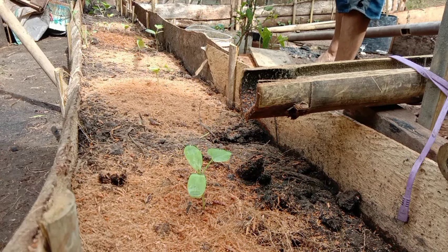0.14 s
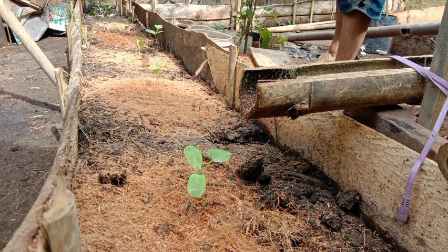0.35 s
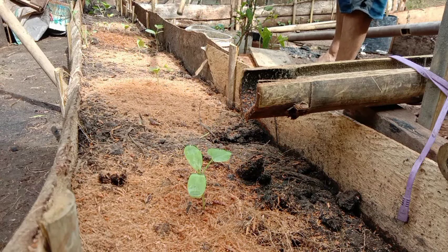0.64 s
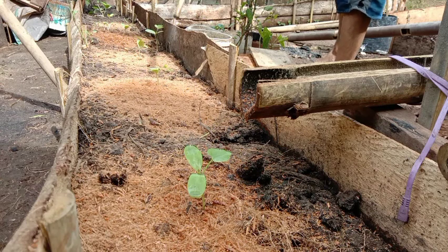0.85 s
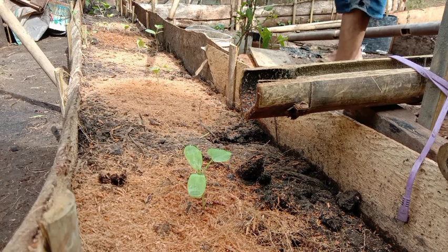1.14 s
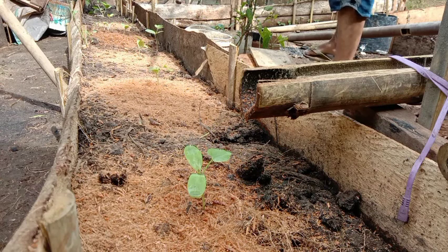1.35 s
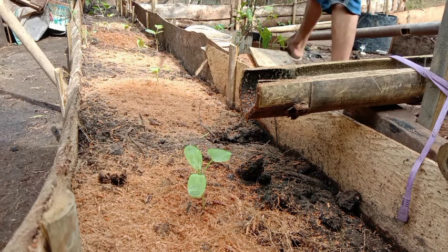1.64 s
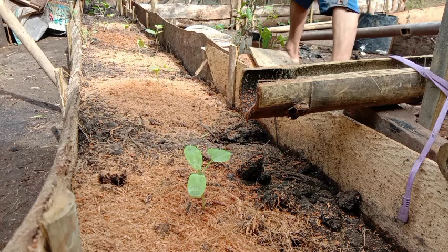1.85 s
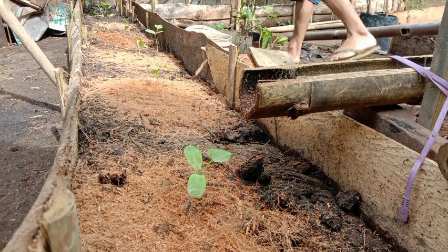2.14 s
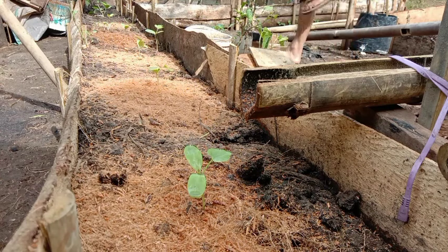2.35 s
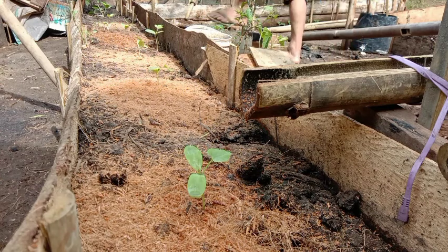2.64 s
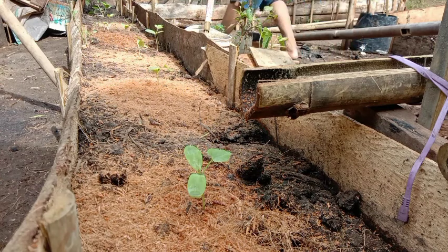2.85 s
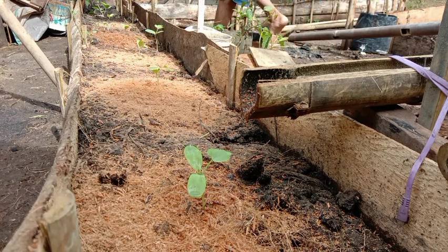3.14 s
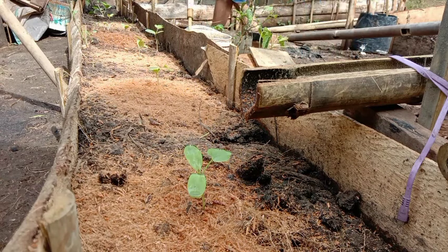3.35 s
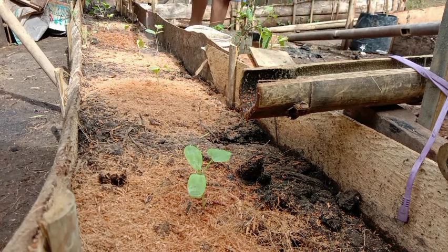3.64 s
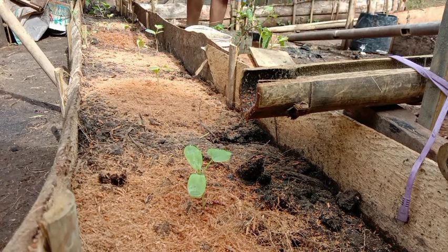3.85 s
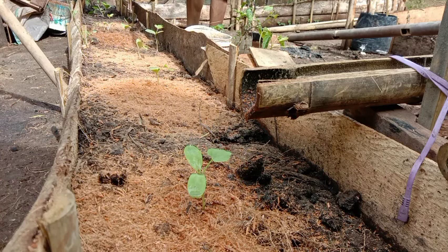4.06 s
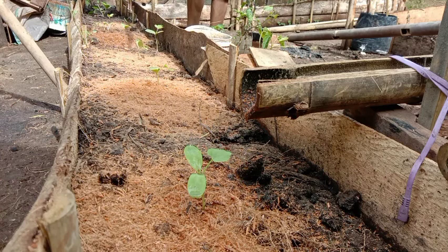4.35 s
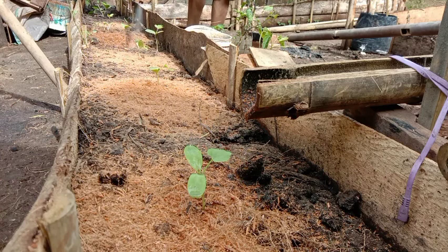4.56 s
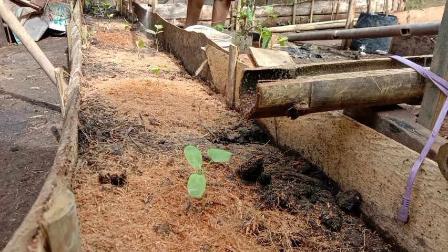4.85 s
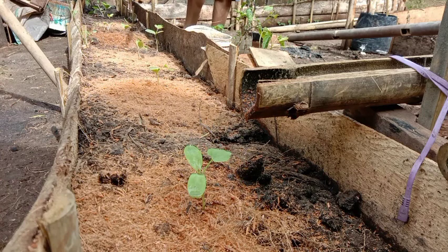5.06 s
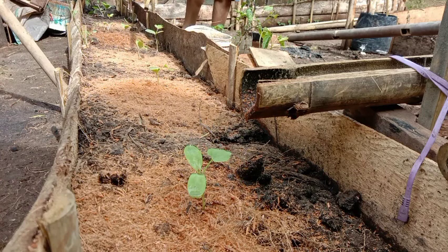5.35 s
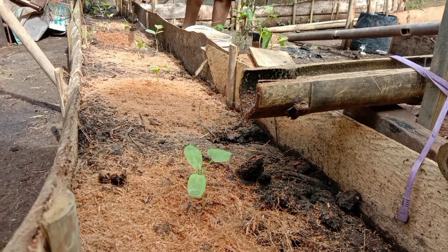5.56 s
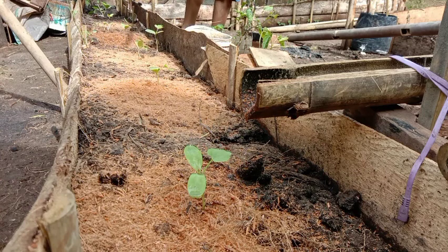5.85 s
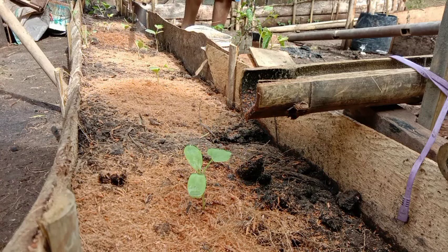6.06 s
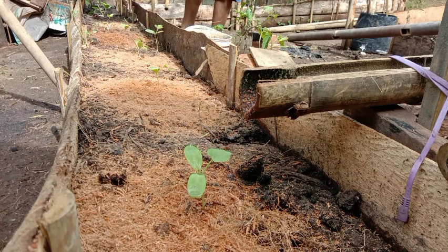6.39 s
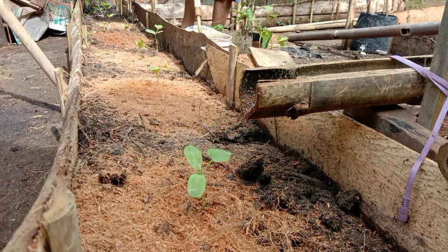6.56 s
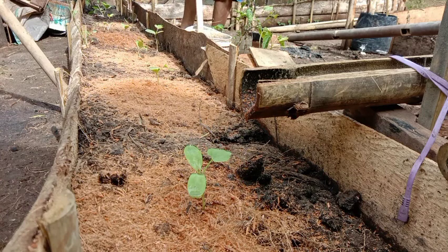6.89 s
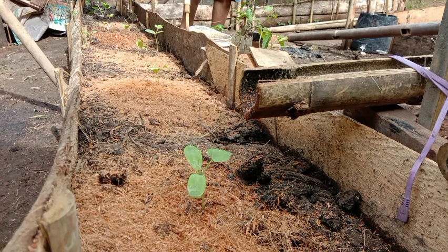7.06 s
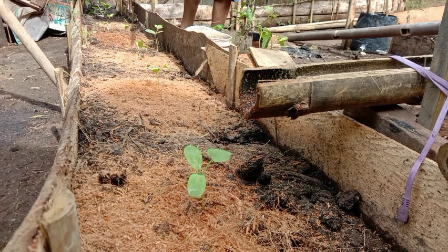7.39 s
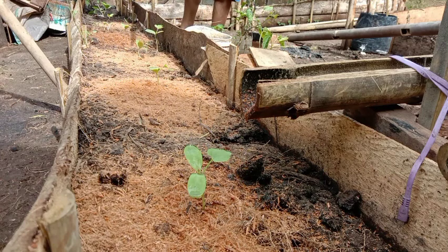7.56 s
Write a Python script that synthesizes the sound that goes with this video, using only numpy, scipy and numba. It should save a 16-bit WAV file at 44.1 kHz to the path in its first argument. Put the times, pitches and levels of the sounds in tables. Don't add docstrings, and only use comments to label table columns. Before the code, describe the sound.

In an open garden, a hand pump sprayer a few metres away gives seven quick hissing jets with hollow gurgles and plastic knocks. A near-silent gap follows with faint quick bird chirps and dim distant calls. A sharp pop restarts the busy spraying, then another quiet pause, a strong burst and weak, sputtering last strokes. A phone microphone with noise suppression leaves the background patchy.

```python
import sys
import numpy as np
from scipy import signal
from scipy.io import wavfile
from scipy.ndimage import uniform_filter1d, minimum_filter1d
from numba import njit

SR = 44100
rng = np.random.default_rng(int(sys.argv[2]) if len(sys.argv) > 2 else 0)


def generate_wav(signal):
    frames = np.transpose(np.atleast_2d(signal))
    scaled = np.clip(frames, -1, 1) * 32767
    pcm = np.round(scaled).astype(np.int16)
    wavfile.write(sys.argv[1], SR, pcm)


def elevation(decibels):
    levels = np.asarray(decibels, float)
    return 10 ** (levels / 20)


N = 340893

# full flow from in seconds, until in seconds, first jet level in dB,
# last jet level in dB, slosh level in dB.
PUSHES = [(-.02, 0.051, -35.5, -41.5, -50), (0.171, 0.276, -39.5, -44, -51),
          (0.334, 0.395, -37.5, -37, -52), (0.504, 0.611, -45.5, -39, -59.5), (0.677, 0.756, -35, -40, -54),
          (0.866, 0.997, -45, -39.5, -57.5), (1.057, 1.178, -38, -39, -60), (3.041, 3.142, -36, -37.5, -55),
          (3.205, 3.298, -45, -41, -51.5), (3.529, 3.624, -43, -42, -54), (3.689, 3.748, -37, -30, -57),
          (3.868, 3.936, -43.5, -45.5, -48), (4.042, 4.076, -34, -42, -58),
          (4.152, 4.226, -45.5, -46.5, -50), (4.56, 4.678, -44, -40, -51.5),
          (4.683, 4.79, -40.5, -47.5, -48.5), (4.863, 5.086, -39, -40, -60),
          (5.193, 5.421, -44, -43.5, -57), (5.507, 5.691, -41, -37.5, -57),
          (6.747, 6.891, -55.5, -40, -73.5), (6.922, 6.996, -40.5, -40, -81.5),
          (7.148, 7.263, -51.5, -41.5, -85), (7.29, 7.318, -47, -46, -78)]
# start in seconds, until in seconds, first jet level in dB,
# last jet level in dB, slosh level in dB.
POPS = [
    (2.823, 2.885, -30.5, -43, -74),
    (3.418, 3.434, -41, -29.5, -55),
    (3.434, 3.445, -29.5, -31.5, -57),
    (4.013, 4.04, -42.5, -34, -56),
    (4.314, 4.345, -36, -30, -61),
    (4.345, 4.432, -27.5, -34, -53),
    (6.541, 6.548, -34, -28.5, -60),
    (6.548, 6.63, -24, -51.5, -54.5),
    (7.055, 7.062, -49.5, -59.5, -84),
    (7.107, 7.125, -50, -47.5, -82),
]
# start in seconds, until in seconds, # first jet
# level in dB, last jet level in dB, slosh level in dB.
SPITS = [
    (3.356, 3.368, -38, -44.5, -68),
    (3.386, 3.392, -40, -42.5, -62),
    (3.402, 3.414, -33, -28, -45.5),
    (3.293, 3.3, -39, -40, -60),
    (3.661, 3.668, -48.5, -47.5, -66),
    (3.84, 3.85, -60, -58, -76),
]
# start in seconds, until in seconds,
# first jet level in dB, last jet level in dB, slosh level in dB.
SEEPS = [
    (2.465, 2.82, -68, -65, -77),
    (3.335, 3.352, -62, -60, -58),
    (3.985, 4.01, -63.5, -78, -72),
    (4.275, 4.31, -71, -61, -64),
    (6.26, 6.33, -83, -72.5, -87),
    (6.33, 6.54, -69, -61, -80),
]
# start in seconds, until in seconds, first level in dB, last level in dB.
GLUGS = [(.58, .62, -52, -45), (.945, .985, -44.5, -42.5), (1.085, 1.12, -46.5, -50.5),
         (2.878, 2.9, -45, -51.5), (2.995, 3.01, -61, -56.5), (3.09, 3.13, -49.5, -52.5),
         (3.2, 3.29, -46.5, -44), (3.405, 3.43, -48.5, -49.5), (3.55, 3.65, -49, -49),
         (3.74, 3.76, -49, -57.5), (3.875, 3.95, -54, -54.5), (4.14, 4.22, -47.5, -47.5),
         (4.34, 4.36, -51.5, -51), (4.51, 4.54, -73, -50.5), (4.72, 4.78, -49, -46),
         (5.165, 5.2, -60.5, -50.5), (5.35, 5.4, -52.5, -48.5), (6.55, 6.575, -53.5, -41.5),
         (6.76, 6.86, -63.5, -65), (6.93, 6.96, -65, -65)]
# time in seconds, chamber pitch in Hz, chamber level in dB,
# fine mist level in dB, jet pitch in Hz; levels are above a jet of medium force.
AIM = [(0, 3136, -5, -1.5, 5960), (.6, 3050, -4, -1.5, 5980), (1.199, 3135, -7.5, -1.5, 6060),
       (2.47, 2880, -6.5, -27, 6650), (2.54, 3000, -16.5, 1, 7020), (2.641, 3010, -10.5, 1.5, 7010),
       (2.803, 3376, -25, -3, 6590), (2.829, 3414, -15.5, -15.5, 6700), (2.899, 3590, -9, -7, 6000),
       (3.049, 3410, -9.5, -0.5, 5770), (3.3, 3506, -6, -3, 5950), (3.439, 3570, -14.5, -5, 5530),
       (3.6, 3600, -6, -3.5, 5960), (3.802, 3690, -11.5, -6, 5560), (4.05, 3796, -6, -2, 5900),
       (4.35, 3830, -14.5, -3, 5640), (4.431, 3400, -11, -5, 6480), (4.598, 3330, -9.5, -5, 5700),
       (4.999, 3230, -11.5, -4.5, 5540), (5.7, 3500, -10, -2.5, 5700), (6.33, 2443, -16, 6, 6200),
       (6.5, 2500, -30, 0, 7170), (6.56, 3646, -9.5, -10.5, 6470), (6.75, 3270, -12, -3.5, 5820),
       (7.0, 3310, -10.5, -4, 5690), (7.069, 3280, -26, 13, 6180), (7.12, 3360, -19.5, 0, 5620),
       (7.299, 3285, -18.5, -1, 5410)]
# centre in Hz, width in Hz, level in dB.
MIST = [(9100, 4900, -2.5), (10200, 2700, 3), (13100, 15000, 14.5)]
# start in seconds, end in seconds, pitch in Hz,
# width in Hz, level above the jet in dB.
SPUTTER = [(6.852, 6.9, 3220, 350, -6), (6.92, 6.945, 3540, 250, -2), (6.94, 6.99, 3080, 240, 0),
           (8, 6.4, 4200, 350, -4), (8.5, 6.2, 5800, 600, -1), (6.855, 6.9, 5400, 700, -4.5),
           (7.105, 7.175, 2470, 300, -1), (7.175, 7.265, 2416, 220, -5), (7.27, 7.33, 2560, 400, -2),
           (7.2, 7.25, 3440, 300, -5), (7.107, 7.2, 8100, 300, -8.5), (7.2, 8.4, 4500, 610, -4.5),
           (7.107, 8.2, 6900, 400, -10.5), (7.19, 7.205, 2100, 200, -5), (7.23, 6, 5800, 340, -7),
           (3.42, 3.46, 5200, 530, 2), (4.33, 4.37, 4900, 560, -9)]
# time in seconds, level above the flow in dB.
SPURTS = [(6.857, 2.5), (6.885, 2), (6.93, 4), (6.952, 2), (6.972, 1.5), (6.995, 6), (7.128, 3),
          (7.19, 4.5), (7.24, 2), (7.262, 6), (7.288, 5), (7.32, 6.5)]
# multiple of the hollow pitch, width in Hz, level in dB.
BARREL = [(.72, 260, 4), (1.01, 490, 7), (1.45, 800, 1.5), (2.049, 1100, -3.5), (1.7, 10000, -6)]
# time in seconds, centre in Hz.
SOIL_DIP = [(0, 2350), (1.2, 2370), (2.8, 2700), (4.2, 2710), (4.55, 2900), (5.2, 2750), (5.7, 2700),
            (7.701, 2750)]
# frequency in Hz, density in dB per Hz.
AIR = [(150, -48), (250, -5.5), (1570, -7.5), (2350, -30), (3230, -5), (4030, -14), (7510, -3.5),
       (14000, -42)]
# time in seconds, level in dB.
THUDS = [(0, -66), (.99, -70), (2.42, -80.5), (3.47, -73), (1.17, -69.5), (1.7, -69.5), (2.55, -76),
         (2.9, -65), (3.1, -68.5), (3.3, -71), (4.37, -74.5), (5.62, -71), (6.59, -75.5), (7.28, -73.5)]
# start in seconds, pitch in Hz, level in dB, 60 dB decay time in seconds.
KNOCKS = [(6.154, 830, -49, .1), (1.09, 900, -46, .08), (.6, 950, -47, .06), (.2, 1050, -46, .06),
          (4.502, 1000, -52, .05), (2.466, 2950, -63, .06), (2.412, 1500, -70, .1), (.964, 1580, -43, .05),
          (1.055, 1350, -47, .02), (4.518, 550, -46, .03), (3.05, 5200, -35, .06), (7.31, 3650, -42, .12),
          (3.297, 3900, -36, .03)]
# start in seconds, end in seconds,
# start pitch in Hz, end pitch in Hz, level in dB.
SWEEPS = [
    (3.0, 2.5, 1700, 4500, -51),
    (4.835, 4.875, 1700, 2800, -51.5),
    (4.87, 4.905, 3000, 3130, -45.5),
    (.47, .51, 2000, 3200, -65),
]
# start in seconds, start pitch in Hz, end pitch in Hz,
# level in dB.
RISING = [(1.215, 7160, 5180, -67), (1.25, 5070, 6740, -66.5), (1.29, 6140, 5250, -71),
          (1.349, 4540, 4950, -58.5), (1.556, 5500, 7000, -70), (1.593, 5020, 6290, -50.5),
          (1.783, 5130, 5800, -62.5), (1.82, 4470, 4965, -59), (2.033, 5700, 6690, -74),
          (2.068, 4980, 5780, -55.5), (2.245, 5210, 5650, -63), (2.26, 5640, 6600, -82.5),
          (2.545, 5300, 5550, -74), (2.726, 5500, 5780, -81), (2.93, 5340, 5870, -66),
          (4.784, 4630, 5200, -48), (5.11, 5060, 5910, -61), (.77, 5450, 6980, -63.5),
          (5.915, 7930, 6470, -73.5), (6.023, 4490, 4740, -65), (5.95, 4250, 4300, -84),
          (7.686, 6650, 6680, -83.5), (1.465, 2940, 3000, -84), (1.52, 2980, 3000, -86.5),
          (1.63, 2930, 3070, -72.5), (1.44, 2460, 2600, -89.5)]
# start in seconds, length in seconds, start pitch in Hz, level in dB.
FALLING = [(1.33, 0.075, 5420, -73.5), (1.4, 0.051, 4180, -77), (1.458, 0.063, 3770, -85),
           (1.688, 0.028, 3140, -75), (1.706, 0.012, 2600, -71.5), (1.728, 0.048, 4030, -77.5),
           (1.78, 0.054, 3030, -77), (1.824, 0.029, 2850, -89), (1.858, 0.029, 4520, -80),
           (1.885, 0.026, 4150, -83), (2.292, 0.034, 4790, -70.5), (2.328, 0.036, 3980, -76.5),
           (2.427, 0.034, 5400, -76.5), (6.061, 0.044, 3880, -77), (7.351, 0.031, 7240, -67),
           (7.468, 0.071, 3770, -92)]
# start in seconds, length in seconds, start pitch in Hz, end pitch in Hz,
# level in dB.
BUZZES = [
    (0.933, 0.035, 408, 416, -45),
    (2.872, 0.03, 420, 380, -58),
    (4.335, 0.018, 280, 372, -48),
    (4.345, .035, 365, 392, -46),
    (4.374, .014, 620, 380, -48),
    (4.515, 0.014, 500, 300, -52),
    (.972, .016, 420, 300, -58),
]
# start in seconds, length in seconds, # start
# pitch in Hz, end pitch in Hz, level in dB.
WHISTLES = [
    (0.952, .035, 1555, 1647, -57),
    (4.21, .07, 340, 320, -67),
    (4.385, 0.07, 350, 311, -68),
    (4.27, .06, 330, 320, -71),
    (4.49, 0.035, 1074, 960, -51),
    (6.56, .045, 430, 400, -62),
    (1.0, .06, 270, 250, -73),
    (.935, .032, 815, 830, -47),
    (2.875, .025, 1150, 1100, -52),
    (2.868, .03, 760, 700, -53),
]
# start in seconds, length in seconds, start pitch in Hz, end pitch in Hz,
# level in dB.
FAR = [(1.11, .09, 241, 228, -68), (1.114, .24, 684, 674, -82), (1.382, .06, 480, 503, -78),
       (1.608, .28, 114.6, 95.5, -65), (1.62, .2, 220.5, 191, -79), (1.617, .27, 420, 408, -74),
       (1.89, .07, 335, 313, -83.5), (2.463, .14, 407, 424, -77), (5.741, .08, 603, 680, -89),
       (5.79, .19, 990, 1020, -81), (5.98, .16, 1030, 1030, -84), (6.16, .16, 1010, 980, -81),
       (6.3, .17, 760, 710, -86), (5.75, .084, 1510, 1710, -85), (2.66, .16, 798, 844, -80),
       (2.65, .08, 600, 560, -80), (3.12, .09, 420, 410, -73), (2.38, .057, 1415, 1530, -80),
       (5.78, .1, 1950, 2030, -90), (5.89, .23, 2020, 2100, -89), (6.15, .1, 2050, 2050, -93),
       (5.78, .05, 3000, 3000, -95), (5.88, .05, 2650, 2650, -91), (5.81, .37, 5150, 5100, -89),
       (5.845, .36, 6220, 6240, -91), (5.98, .11, 3170, 3060, -92), (7.37, .08, 720, 686, -87)]
# time in seconds, high leaves level in dB, low rustle level in dB.
PUFFS = [
    (1.24, -77, -80.5),
    (1.95, -80, -82.5),
    (2.38, -84, -88),
    (5.76, -102, -91),
    (5.95, -85.5, -91.5),
    (6.26, -77, -75.5),
    (7.38, -84.5, -86.5),
    (7.7, -82.5, -78.5),
]
# level of the bin in dB, depth of the patches in dB.
GATE = [(-108, 4), (-96, 11), (-79, 12), (-68, 3.4)]

PUSH_RISE_DB_S, PUSH_FALL_DB_S, PUSH_ROUND_S = 800, 620, .018
POP_RISE_DB_S, POP_FALL_DB_S = 6002, 300.5
SPIT_RISE_DB_S, SPIT_FALL_DB_S = 6000, 1200
SEEP_RISE_DB_S, SEEP_FALL_DB_S = 1200, 300
GLUG_RISE_DB_S, GLUG_FALL_DB_S = 462.5, 456.5
CLOSING_DB_S2 = 4998
OPENS_EARLY_S, OPENING_DB, OPENED_DB, OPENING_DB_S = .027, -12, -5, 1800
SPURT_RISE_DB_S, SPURT_FALL_DB_S = 901, 497.5
MEDIUM_DB = -38
CHAMBER_PER_DB, MIST_PER_DB = -0.23, 0.07
SKIRT_HZ, SKIRT_WIDTH_HZ, SKIRT_DB = 2110, 1300, -22
HOLLOW_HZ, HOLLOW_HZ_PER_DB, CALM_DB, LOWEST_HZ = 1251, -28, -56, 1000
EDGE_HZ, DEEP_HZ, DEEP_WIDTH_HZ, DEEP_DB, DEEP_PER_DB = 640, 568, 200, -27, 1.66
YARD_T60_S, YARD_DB = 0.12, -13.5
SOIL_DIP_WIDTH_HZ, SOIL_DIP_SHARE = 87., 0.51
AIR_DB = -85.5
RUMBLE_SHUT_DB, RUMBLE_OPEN_DB, GATE_OPENS_DB, GATE_SPAN_DB = -87, -75, -61.5, 24.5
THUD_RISE_DB_S, THUD_FALL_DB_S = 151.5, 90.5
KNOCK_RISE_S = .003
SWEEP_WIDTH_HZ = 870
RISING_S, FALLS_TO = .032, .92
TREES_T60_S, TREES_DB = .23, 0
BUZZ_STEP_DB, WHISTLE_STEP_DB = -2, -24.5
PUFF_RISE_DB_S, PUFF_FALL_DB_S, LEAVES_DB, RUSTLE_DB = 262, 160, -93.5, -100
TOP_HZ = 14050


def level(x, db):
    return x * elevation(db) / np.sqrt(np.mean(x ** 2))


@njit
def svf(x, hz, width):
    y, band, low = np.empty(len(x)), 0., 0.
    for i in range(len(x)):
        g, k = np.tan(np.pi * hz[i] / SR), width / hz[i]
        v = (band + g * (x[i] - low)) / (1 + g * (g + k))
        band, low, y[i] = 2 * v - band, low + 2 * g * v, k * v
    return y


def ring(x, hz, width):
    hz = hz * np.ones(N)
    once = svf(x, hz, 1. * width)
    return level(svf(once, hz, 1. * width), 0)


def walk(rate, count=N):
    k = int(SR / rate)
    steps = np.repeat(rng.standard_normal(count // k + 1), k)
    return 1.3 * uniform_filter1d(uniform_filter1d(steps, k), k)[:count]


def eddy(x):
    return np.roll(x, rng.integers(N))


def spit(rate, drops_db, flicker_db):
    bursts = rng.random(N) < rate / SR
    size = elevation(1.5 * np.minimum(rng.exponential(size=N), 3))
    drops = bursts * size * rng.choice([-1, 1], N)
    noise = rng.standard_normal(N) * elevation(flicker_db * (walk(25) + walk(150)))
    return noise + level(drops, drops_db)


def note(start, length, hz0, hz1, partials_db, wobble, flutter_db, soft):
    out, i = np.zeros(N), int(start * SR)
    n = min(int(length * SR), N - i)
    u = np.arange(n) / n
    glide_hz = hz0 + (hz1 - hz0) * np.sin(np.pi / 2 * u)
    phase = 2 * np.pi * np.cumsum(glide_hz * (1 + wobble * walk(100, count=n))) / SR
    tone = sum(elevation(db) * np.sin((k + 1) * phase) for k, db in enumerate(partials_db))
    out[i:i + n] = tone * elevation(flutter_db * walk(28, count=n)) * 2.6 * np.sin(np.pi * u) ** soft
    return out


def swell(rows, rise, fall, quiet_db=-120, closing=0):
    t, out = np.arange(N) / SR, np.full(N, 1. * quiet_db)
    for s, end, db0, db1 in rows:
        hold = np.interp(t, [s, max(end, s + 1 / SR)], [db0, db1])
        before, after = np.maximum(s - t, 0), np.maximum(t - end, 0)
        out = np.maximum(out, hold - rise * before - fall * after - closing * after ** 2)
    return out


def bumps(rows, rise, fall, quiet_db=-120, axis=1):
    return swell([(row[0], row[0], row[axis], row[axis]) for row in rows], rise, fall, quiet_db)


def aim(axis):
    return np.interp(np.arange(N) / SR, *np.transpose(AIM)[[0, axis]])


def pumping():
    openings = [(s - OPENS_EARLY_S, s, db + OPENING_DB, db + OPENED_DB, slosh + OPENING_DB)
                for s, _, db, _, slosh in PUSHES]
    kinds = [(openings, OPENING_DB_S, PUSH_FALL_DB_S, 0),
             (PUSHES, PUSH_RISE_DB_S, PUSH_FALL_DB_S, PUSH_ROUND_S),
             (POPS, POP_RISE_DB_S, POP_FALL_DB_S, 0),
             (SPITS, SPIT_RISE_DB_S, SPIT_FALL_DB_S, 0),
             (SEEPS, SEEP_RISE_DB_S, SEEP_FALL_DB_S, 0)]
    jet_db, slosh_db = [], [swell(GLUGS, GLUG_RISE_DB_S, GLUG_FALL_DB_S)]
    for rows, rise, fall, round_s in kinds:
        flow_db = swell([row[:4] for row in rows], rise, fall, closing=CLOSING_DB_S2)
        jet_db.append(uniform_filter1d(flow_db, int(round_s * SR) + 1))
        steady = [(s, end, db, db) for s, end, _, _, db in rows]
        slosh_db.append(swell(steady, rise, fall, closing=CLOSING_DB_S2))
    return np.max(jet_db, axis=0), np.max(slosh_db, axis=0)


def sputter(spray, drift):
    t, out = np.arange(N) / SR, np.zeros(N)
    for s, end, hz, width, db in SPUTTER:
        envelope = np.interp(t, [s, s + 0.0055, end, end + .005], [0, 1, 1, 0])
        unsteady = elevation(db + 3.5 * walk(90) + 2.5 * walk(45))
        out += unsteady * envelope * ring(eddy(spray), hz * (1 + np.roll(drift, int(hz))), width)
    return out


def jet(jet_db):
    nozzle = signal.butter(5, 2150, "high", fs=SR, output="sos")
    spray = signal.sosfilt(nozzle, spit(1400, -11.5, 0.83))
    drift = .025 * np.array([walk(20), walk(30), walk(15)])
    force_db = np.clip(jet_db - MEDIUM_DB, -25, 15)
    chamber = ring(eddy(spray), aim(axis=1) * (1 + drift[0]), 1600)
    chamber = chamber + elevation(-14.0) * ring(eddy(spray), 4350 * (1 + drift[1]), 820)
    core = ring(spray, aim(axis=4), 3400)
    core = core + elevation(-4.0) * ring(eddy(spray), 5400 * (1 + 2 * drift[2]), 840)
    core = core + elevation(-12) * ring(eddy(spray), 6800 * (1 + drift[1]), 780)
    mist = sum(elevation(db) * ring(eddy(spray), hz, width) for hz, width, db in MIST)
    skirt = ring(spit(900, -3.0, 0.87), SKIRT_HZ, SKIRT_WIDTH_HZ)
    skirt_db = SKIRT_DB + aim(axis=2) / 2 + 2.5 * walk(20)
    chamber_db = aim(axis=2) + CHAMBER_PER_DB * force_db
    mist_db = aim(axis=3) + MIST_PER_DB * force_db
    return elevation(jet_db) * (level(core, 0) + sputter(spray, drift[0]) + elevation(skirt_db) * skirt
                          + elevation(chamber_db) * level(chamber, 0) + elevation(mist_db) * level(mist, 0))


def barrel(slosh_db):
    slosh = spit(400, -1.5, 1.8)
    force_db = uniform_filter1d(np.maximum(slosh_db - CALM_DB, 0), int(0.059 * SR))
    hollow_hz = np.maximum(HOLLOW_HZ + HOLLOW_HZ_PER_DB * force_db, LOWEST_HZ) * (1 + .05 * walk(9))
    body = np.zeros(N)
    for multiple, width, db in BARREL:
        hz = multiple * hollow_hz * (1 + 0.091 * walk(22))
        body += elevation(db + 2.2 * walk(30)) * ring(eddy(slosh), hz, width)
    edge = signal.butter(6, EDGE_HZ, "high", fs=SR, output="sos")
    body = level(signal.sosfilt(edge, body), 0)
    deep_db = np.minimum(DEEP_DB + DEEP_PER_DB * force_db, -2)
    deep = elevation(deep_db) * ring(slosh, DEEP_HZ * (1 + .06 * walk(15)), DEEP_WIDTH_HZ)
    return elevation(slosh_db) * (body + deep)


def yard(x):
    t = np.arange(SR // 4) / SR
    wash = rng.standard_normal(len(t)) * elevation(-60 * t / YARD_T60_S)
    return x + elevation(YARD_DB) * signal.fftconvolve(x, wash / np.sqrt(np.sum(wash ** 2)))[:N]


def soil(x):
    dip_hz = np.interp(np.arange(N) / SR, *np.transpose(SOIL_DIP)) * (1 + 0.025 * walk(8))
    return x - SOIL_DIP_SHARE * svf(x, dip_hz, SOIL_DIP_WIDTH_HZ)


def air():
    hiss, (hz, db) = np.zeros(N), np.transpose(AIR)
    for centre in 280 * 2 ** np.arange(0, 5.8, .5):
        band_db = np.interp(np.log(centre), np.log(hz), db) + 10 * np.log10(centre) + 0.37 * walk(11)
        hiss += elevation(band_db) * ring(rng.standard_normal(N), centre, centre / 2)
    return level(hiss, AIR_DB)


def rumble(jet_db):
    low = ring(rng.standard_normal(N), 110, 170) * elevation(2.2 * walk(18))
    open_db = np.interp(jet_db, [GATE_OPENS_DB, GATE_OPENS_DB + GATE_SPAN_DB], [RUMBLE_SHUT_DB, RUMBLE_OPEN_DB])
    thuds_db = bumps(THUDS, THUD_RISE_DB_S, THUD_FALL_DB_S)
    rumble_db = np.maximum(uniform_filter1d(open_db, int(0.035 * SR)), thuds_db)
    return elevation(rumble_db) * level(low, 0)


def knocks():
    out, t = np.zeros(N + SR), np.arange(SR // 4) / SR
    for s, hz, db, t60 in KNOCKS:
        i = int(s * SR)
        phase = 2 * np.pi * np.cumsum(hz * (1 + .03 * walk(300, count=len(t)))) / SR
        envelope = elevation(db - 60 * t / t60) * np.minimum(t / KNOCK_RISE_S, 1)
        out[i:i + len(t)] += envelope * np.sin(phase)
    return out[:N]


def sweeps():
    t, noise, out = np.arange(N) / SR, spit(600, -6.0, 1.5), np.zeros(N)
    for s, end, hz0, hz1, db in SWEEPS:
        envelope = np.interp(t, [s, s + 0.0064, end - .008, end], [0, 1, 1, 0])
        climb_hz = np.interp(t, [s, end], [hz0, hz1])
        out += elevation(db) * envelope * ring(noise, climb_hz, SWEEP_WIDTH_HZ)
    return out


def birds():
    chirps = [(s, RISING_S, hz0, hz1, db) for s, hz0, hz1, db in RISING]
    chirps += [(s, length, hz, FALLS_TO * hz, db) for s, length, hz, db in FALLING]
    direct = sum(note(s, length, hz0, hz1, [db], .014, 1.0, .5) for s, length, hz0, hz1, db in chirps)
    t = np.arange(SR // 2) / SR
    echoes = rng.standard_normal(len(t)) * elevation(-60 * t / TREES_T60_S) * (1 - np.exp(-t / 0.002))
    echoes /= np.sqrt(np.sum(echoes ** 2))
    return .2 * direct + elevation(TREES_DB) * signal.fftconvolve(direct, echoes)[:N]


def seal():
    out = np.zeros(N)
    for rows, step_db in [(BUZZES, BUZZ_STEP_DB), (WHISTLES, WHISTLE_STEP_DB)]:
        for s, length, hz0, hz1, db in rows:
            partials_db = db + step_db * np.arange(4) ** 4.1
            out += note(s, length, hz0, hz1, partials_db, wobble=.012, flutter_db=2.0, soft=.6)
    return out


def far_calls():
    return sum(note(s, length, hz0, hz1, [db], .007, 2.2, .5) for s, length, hz0, hz1, db in FAR)


def leaves():
    noise = rng.standard_normal(N)
    high = ring(noise, 9000, 2600) + elevation(-6) * ring(noise, 7750, 300)
    rustle = ring(noise, 1600 * (1 + 0.39 * walk(35)), 1200)
    high_db = bumps(PUFFS, PUFF_RISE_DB_S, PUFF_FALL_DB_S, LEAVES_DB)
    rustle_db = bumps(PUFFS, PUFF_RISE_DB_S, PUFF_FALL_DB_S, RUSTLE_DB, axis=2)
    return elevation(high_db) * level(high, 0) + elevation(rustle_db) * rustle


def scene():
    jet_db, slosh_db = pumping()
    spurt_db = bumps(SPURTS, SPURT_RISE_DB_S, SPURT_FALL_DB_S, 0)
    sprayer = soil(yard(jet(jet_db + spurt_db) + barrel(slosh_db) + sweeps()))
    garden = air() + rumble(jet_db) + birds() + far_calls() + leaves()
    return (sprayer + knocks() + seal() + garden)[None, :]


def gate(x):
    hz, _, spec = signal.stft(x, SR, nperseg=512, noverlap=384)
    field = uniform_filter1d(rng.standard_normal(spec.shape), size=2, axis=0)
    field = uniform_filter1d(uniform_filter1d(field, size=30, axis=1), size=6, axis=1)
    bins = np.abs(spec) ** 2
    power = uniform_filter1d(uniform_filter1d(bins, size=9, axis=0), size=9, axis=1)
    reach = np.interp(hz, [300, 700, 5000, 8000], [0, 1, 1, .6])[:, None]
    depth_db = reach * np.interp(10 * np.log10(power + 1e-18), *np.transpose(GATE))
    tonal_db = 10 * np.log10(uniform_filter1d(bins, size=13, axis=1) / (power + 1e-18) + 1e-18)
    depth_db = depth_db * minimum_filter1d(np.interp(tonal_db, [4.5, 6.5], [1, .25]), size=3, axis=0)
    patches_db = depth_db * np.minimum(field / field.std(), 1.1)
    return signal.istft(spec * elevation(patches_db), nperseg=512, noverlap=384)[1][:N]


def band_limit(x):
    return signal.sosfilt(signal.butter(12, 15310, fs=SR, output="sos"), x)


def record(dry):
    top_cut = signal.ellip(10, .3, 70, TOP_HZ, fs=SR, output="sos")
    mix = signal.sosfilt(top_cut, gate(dry[0]))[None, :]
    return band_limit(mix)


dry = scene()
out = record(dry)
generate_wav(out)
```